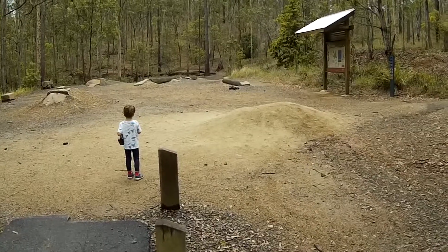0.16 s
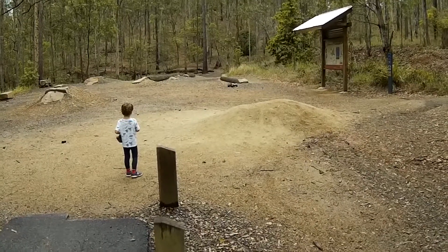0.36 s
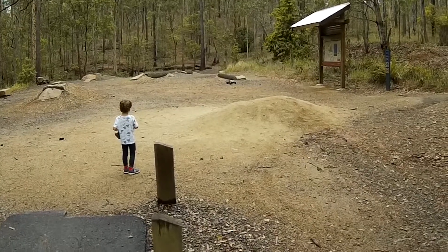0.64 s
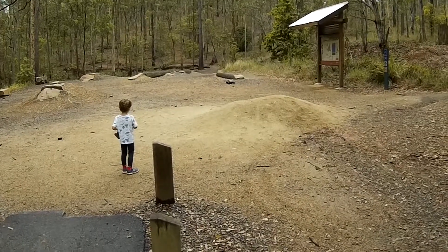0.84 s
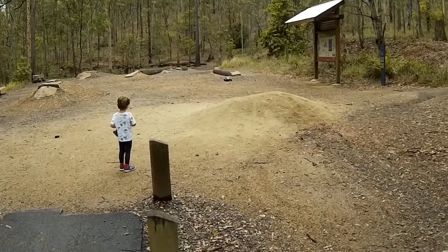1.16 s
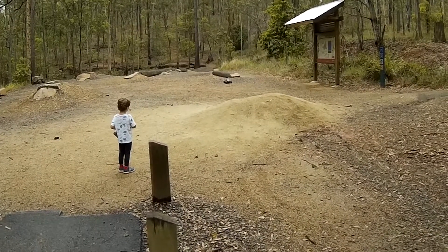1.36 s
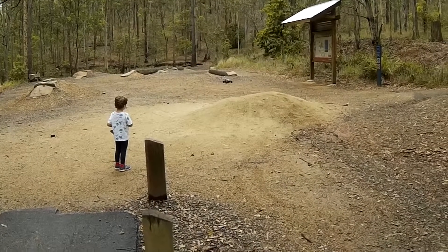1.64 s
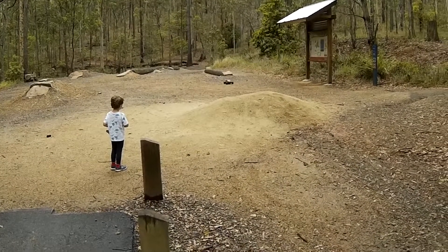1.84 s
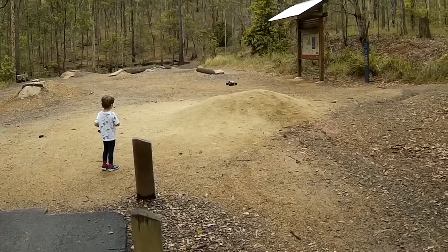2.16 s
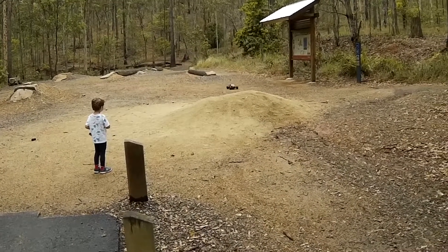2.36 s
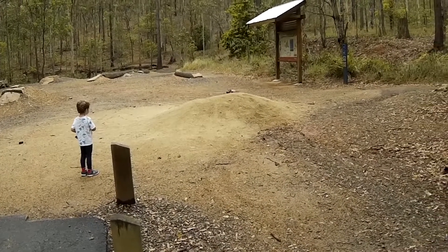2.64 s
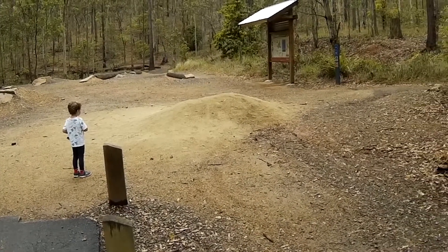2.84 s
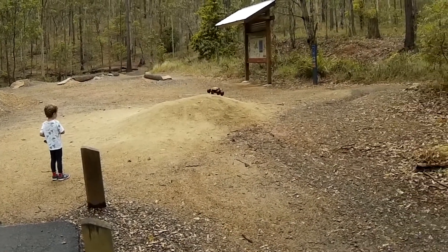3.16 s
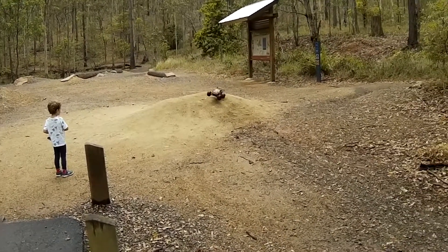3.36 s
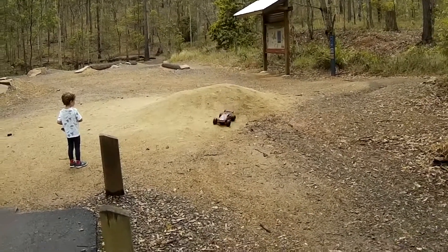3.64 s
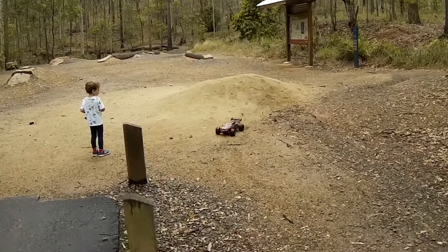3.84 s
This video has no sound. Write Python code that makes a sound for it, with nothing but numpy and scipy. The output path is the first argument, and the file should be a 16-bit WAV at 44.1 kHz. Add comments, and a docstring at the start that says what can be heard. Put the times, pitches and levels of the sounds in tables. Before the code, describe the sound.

Near silence with a few faint plastic ticks and one tiny bird chirp, then a remote-controlled car accelerates with a buzzy gear whir, eases off, and lands in rattling, gritty jolts closer to the outdoor microphone.

```python
"""A dirt clearing in a wood: a small electric model car creeps, then speeds up towards the listener, over a mound.
Its gear mesh is a tone that breaks into noise bands and lights up the modes of a plastic shell.
Coloured random clicks make the rattling gears, thrown grit and rolling tyres; noise makes rumble and air.
Short sine rings and a thin whine mark the creeping car, a gliding sine a far bird.
Timed bursts are the jolts: grit sprays, the shell rattles, the chassis bangs down."""
import sys
import numpy as np
from scipy import signal
from scipy.fft import rfft, irfft
from scipy.io import wavfile

SR = 44100
rng = np.random.default_rng(int(sys.argv[2]) if len(sys.argv) > 2 else 0)


def dump_mix(stems):
    """Bounce the given channels to the path in sys.argv[1] as a 16-bit WAV at rate SR."""
    frames = np.atleast_2d(stems).T  # one column per channel
    limited = np.clip(frames, -1, 1)  # hard clip at full scale
    pcm = np.round(limited * 32767).astype(np.int16)
    wavfile.write(sys.argv[1], SR, pcm)


N = 176400

# Spectra shared by the running car and its jolts; columns: pitch_hz [Hz], relative density_db [dB per Hz]
# lower body of the plastic shell
SHELL_COLOUR = [(590, -77), (1000, -25), (1170, -8.5), (1610, 5), (1790, -0.5), (2150, -2), (2230, -16),
                (2340, -28), (2600, -12), (3380, -13.5), (5720, -120)]
# upper modes of the shell
UPPER_SHELL_COLOUR = [(1290, -19), (2200, 2), (2360, -7), (2600, -6.5), (2820, -14), (3040, 1.5),
                      (3560, -10.5), (3900, -13.5), (5070, -21), (8580, -120)]
# grit thrown by the tyres
GRIT_COLOUR = [(2060, -7.5), (3500, -12.5), (3650, -10.5), (4190, -4), (4610, -8.5), (5290, -1),
               (6020, -9.5), (6890, -0.5), (7300, 1.5), (8810, -8.5), (9500, -16.5), (12400, -46),
               (20900, -120)]
# finest grit, the top treble
FINE_GRIT_COLOUR = [(5530, -37), (9400, -9), (10500, 2), (11400, -7.5), (12300, -5.5), (12800, -10.5),
                    (13400, -23), (14000, -27)]


def amp(db):
    """Decibels to linear gain."""
    return 10 ** (np.asarray(db) / 20)


def rms_one(x):
    """Scales x to an rms of 1."""
    return x / np.sqrt(np.mean(x ** 2) + 1e-20)


def in_time(rows):
    """Columns of a table as curves against time, straight between its rows."""
    s, *columns = np.transpose(rows)
    return [np.interp(np.arange(N) / SR, s, column) for column in columns]


def inside(rows, fade_s):
    """One over the time span of a table, fading to zero outside."""
    t = np.arange(N) / SR
    fade_in = t - rows[0][0] + fade_s
    fade_out = rows[-1][0] + fade_s - t
    return np.clip(np.minimum(fade_in, fade_out) / fade_s, 0, 1)


def drift(rate_hz):
    """Random wander of rms 1: white noise through a double one-pole lowpass."""
    r = np.exp(-2 * np.pi * rate_hz / SR)
    noise = rng.standard_normal(N + SR)
    return rms_one(signal.lfilter([1], [1, -2 * r, r * r], noise)[SR:])  # first second settles the filter


def colour(x, spectrum, edge_db_per_octave=30):
    """Weights x by a spectrum that falls away outside its ends; rms 1."""
    hz, db = np.transpose(spectrum)
    octave = np.log2(np.arange(N // 2 + 1) * SR / N + 1)
    below = np.maximum(np.log2(hz[0]) - octave, 0)
    above = np.maximum(octave - np.log2(hz[-1]), 0)
    gain_db = np.interp(octave, np.log2(hz), db) - edge_db_per_octave * (below + above)
    return rms_one(irfft(rfft(x) * amp(gain_db), N))


def noise_in(spectrum):
    """Steady coloured noise, rms 1."""
    return colour(rng.standard_normal(N), spectrum)


def grains(per_s, spread_db):
    """Random clicks of uneven size and either sign."""
    hits = rng.random(N) < per_s / SR
    sizes = amp(spread_db * np.minimum(rng.exponential(1, N), 5))
    return hits * sizes * rng.choice([-1, 1], N)


def bursts(times, levels_db, rise_s, fall_s):
    """Envelope of short swells: linear rise, exponential fall, each cut off after 0.15 s."""
    t = np.arange(N) / SR
    out = np.zeros(N)
    for s, db, fall in zip(times, levels_db, np.broadcast_to(fall_s, len(times))):
        a, b = int(s * SR), int((s + .15) * SR)
        u = t[a:b] - s
        out[a:b] += amp(db) * np.clip(u / rise_s, 0, 1) * np.exp(-np.maximum(u - rise_s, 0) / fall)
    return out


def resonate(x, hz, width_hz):
    """Two-pole resonance, gain about 1 on top."""
    r = np.exp(-np.pi * width_hz / SR)
    return signal.lfilter([1 - r, 0, r - 1], [1, -2 * r * np.cos(2 * np.pi * hz / SR), r * r], x)


def wood_air():
    """Quiet air of the wood: coloured noise with a slowly wandering level."""
    # spectrum of the wood: pitch_hz [Hz], relative density_db [dB per Hz]
    wood_colour = [(150, -31), (250, 7.5), (322, 4), (533, 5), (899, -1.5), (1440, 9), (1570, -10.5),
                   (1700, -13), (1950, -2), (3070, -9), (7370, -14), (12200, -8), (14000, -18)]
    return amp(-63 + .5 * drift(6.4)) * noise_in(wood_colour)


def rumble():
    """Low roll of the wheels and deep moving air: two bands of noise with their own level curves."""
    # low roll: time_s [s], level_db [dB, before trim]
    roll_levels = [(0.0, -65.5), (1.3, -64.5), (1.49, -56.5), (2.22, -58.5), (2.8, -52), (3.27, -57.5),
                   (3.65, -54), (3.68, -48.5), (3.8, -54), (3.85, -43.5), (3.96, -57), (4.0, -24)]
    # deep air: time_s [s], level_db [dB, before trim]
    air_levels = [(0.0, -62), (1.23, -64.5), (1.39, -59), (3.41, -59), (3.96, -54), (3.99, -40)]
    # spectra of roll and air: pitch_hz [Hz], relative density_db [dB per Hz]
    roll_colour = [(71, -32), (120, -4), (183, 3), (227, -4.5), (280, -1.5), (350, -3.5), (460, -25),
                   (770, -120)]
    air_colour = [(12, -35), (20, -8.5), (60, 0), (140, -5), (180, -32), (310, -120)]
    roll_db, = in_time(roll_levels)
    air_db, = in_time(air_levels)
    roll = amp(roll_db - 1.7) * noise_in(roll_colour)
    deep_air = amp(air_db + 1.0) * noise_in(air_colour)
    return roll + deep_air


def running():
    """Clicks coloured as shell rattle, grit and tyre roll, all shaken together by the rough ground."""
    # car: time_s [s], gear rattle_db, grit and brush hiss_db, tyre roll_db [dB, before trims]
    car_levels = [(0.0, -70, -72, -76), (0.03, -57.5, -70, -65), (0.13, -67, -72.5, -71),
                  (0.41, -57, -68, -60.5), (0.68, -57.5, -71.5, -60.5), (0.71, -49.5, -69, -60),
                  (0.92, -60.5, -70, -68), (1.25, -63.5, -73, -70), (1.33, -39.5, -59, -56.5),
                  (1.35, -45, -58.5, -58), (1.41, -34, -44, -50), (1.45, -36, -45.5, -48),
                  (1.5, -34.5, -42, -46.5), (1.57, -36.5, -45, -49), (1.69, -36.5, -42.5, -47.5),
                  (2.09, -36, -41.5, -49), (2.82, -34.5, -45.5, -46.5), (2.97, -38, -44, -45.5),
                  (3.08, -48, -52, -51), (3.23, -36, -41, -49), (3.28, -36, -46, -49),
                  (3.3, -37, -40.5, -46), (3.42, -37, -41, -44.5), (3.48, -32, -35, -39.5),
                  (3.49, -38, -39, -45), (3.52, -29, -32.5, -37), (3.54, -29.5, -36, -37.5),
                  (3.64, -39.5, -37, -43), (3.66, -30, -33.5, -29), (3.68, -29, -35, -44),
                  (3.69, -24, -19, -31), (3.71, -33, -53, -38), (3.73, -33.5, -39, -40.5),
                  (3.82, -38.5, -40, -41), (3.83, -38, -40.5, -43.5), (3.86, -30, -38.5, -38),
                  (3.91, -39, -39, -41.5), (3.93, -36, -29.5, -37.5), (3.97, -34.5, -37.5, -41),
                  (3.99, -38, -36, -24)]
    # upper shell mode: time_s [s], level_db [dB, before trim]
    upper_levels = [(0.0, -75.5), (0.71, -67), (1.21, -82), (1.37, -42), (1.4, -43), (1.44, -42),
                    (1.47, -34), (1.5, -33), (1.51, -40), (1.62, -40.5), (2.04, -39.5), (2.88, -41),
                    (3.08, -45), (3.2, -37), (3.5, -39), (3.51, -36), (3.68, -36), (3.69, -42), (3.71, -45),
                    (3.77, -63), (3.98, -45), (3.99, -44)]
    # spectrum of the tyres: pitch_hz [Hz], relative density_db [dB per Hz]
    tyre_colour = [(180, -6), (300, -13), (388, -9.5), (434, -5.5), (469, -10.5), (554, -3.5), (611, -4.5),
                   (1010, -2.5), (1160, -11), (1300, -7), (1690, -29), (2860, -120)]
    rattle_db, grit_db, tyre_db = in_time(car_levels)
    upper_db, = in_time(upper_levels)
    shake = drift(26)

    main_mode = rms_one(resonate(grains(1500, 4.4), 1626, 31))  # Hz, width in Hz
    shell = colour(grains(5000, 1.2), SHELL_COLOUR) + amp(-9) * main_mode
    rattle = amp(rattle_db - 3.5 + 0.3 * shake + 0.76 * drift(27)) * shell

    upper_gain = amp(upper_db - 4.5 + 0.56 * shake) * inside(upper_levels, .05)
    upper = upper_gain * colour(grains(5000, 2.6), UPPER_SHELL_COLOUR)
    grit_gain = amp(grit_db - 1.26 + .9 * shake + 0.77 * drift(80))
    grit = grit_gain * colour(grains(12000, 2.36), GRIT_COLOUR)
    tyres = amp(tyre_db - 0.76 + 0.2 * shake) * colour(grains(3000, 1.24), tyre_colour)
    return rattle + upper + grit + tyres


def creeping():
    """Short rough rings of the shell as decaying sines, and a thin whine, perhaps of the speed controller."""
    # rings: start_s [s], level_db [dB, before the shared flutter], pitch_hz [Hz], fall_s [s]
    shell_rings = [(0.029, -49, 1585, 0.0048), (.365, -48, 1530, 0.0071), (.40, -60, 1850, 0.035),
                   (.48, -56, 978, 0.023), (.5, -54, 1590, 0.0074), (.535, -55, 545, 0.04),
                   (.585, -50.5, 1620, 0.037), (.675, -49, 1470, 0.011), (.698, -40.5, 1585, 0.01),
                   (0.719, -46, 1553, 0.0084), (.76, -45, 1576, 0.0082), (.79, -48, 1577, 0.011),
                   (.85, -56, 1620, 0.0099)]
    # thin whine: time_s [s], pitch_hz [Hz], level_db [dB, before trim]
    whine_path = [(0.0, 3940, -99), (0.014, 4005, -82), (0.062, 4015, -76), (0.18, 4009, -98),
                  (0.22, 4000, -75), (0.244, 3912, -90), (0.504, 4019, -74.5), (0.51, 4050, -79),
                  (0.71, 3999, -73), (0.8, 4100, -81)]
    t = np.arange(N) / SR
    rings = np.zeros(N)
    for s, db, hz, fall_s in shell_rings:
        rings += bursts([s], [db], .01, fall_s) * np.sin(2 * np.pi * hz * t)
    rings *= amp(2.1 * drift(60))  # roughness

    hz, db = in_time(whine_path)
    whine_gain = amp(db + 2.0 + 4.3 * drift(30)) * inside(whine_path, .02)
    return rings + whine_gain * np.sin(2 * np.pi * np.cumsum(hz) / SR)


def bird():
    """One short chirp of a far bird: a sine that rises in pitch and levels off."""
    start_s, length_s = .175, .048
    from_hz, to_hz = 1950, 2720
    u = np.clip((np.arange(N) / SR - start_s) / length_s, 0, 1)
    hz = from_hz + (to_hz - from_hz) * np.sin(np.pi * np.minimum(u * 0.62, .5))
    return amp(-65) * np.sin(np.pi * u) * np.sin(2 * np.pi * np.cumsum(hz) / SR)


def sizzle():
    """Finest grit: bright clicks flickering on their own, growing as the car nears."""
    # top treble: time_s [s], level_db [dB, before trim]
    sizzle_levels = [(1.2, -82), (1.27, -83), (1.41, -61.5), (1.57, -56.5), (1.77, -59), (1.85, -53.5),
                     (2.99, -58), (3.07, -65), (3.25, -53), (3.5, -49.5), (3.51, -42), (3.53, -46.5),
                     (3.68, -47), (3.69, -33), (3.72, -51), (3.8, -51.5), (3.83, -43), (3.92, -47),
                     (3.93, -42), (3.99, -45)]
    db, = in_time(sizzle_levels)
    gain = amp(db - 0.1 + 1.2 * drift(32)) * inside(sizzle_levels, .03)
    return gain * colour(grains(9000, 2.3), FINE_GRIT_COLOUR, 60)


def noise_band(width_hz):
    """Complex wander that smears a tone into a band of noise."""
    return (drift(width_hz) + 1j * drift(width_hz)) / np.sqrt(2)


def blur(rough, wide, stretch):
    """Mix of the clean tone with a narrow and a wide noise band, by shares of power."""
    narrow_hz, wide_hz = 50, 200
    narrow_part = np.sqrt(1 - wide) * noise_band(stretch * narrow_hz)
    wide_part = np.sqrt(wide) * noise_band(stretch * wide_hz)
    return np.sqrt(1 - rough) + np.sqrt(rough) * (narrow_part + wide_part)


def gear_whine():
    """Tooth rate and its octave, cleaner at the start, then rough and heard mostly through shell modes."""
    # gear mesh: time_s [s], tooth rate pitch_hz [Hz], level_db, octave_db [dB, before roughness and modes]
    mesh_path = [(1.28, 740.5, -78, -66), (1.315, 834, -66, -48.5), (1.345, 1083, -61, -45),
                 (1.36, 1301, -48, -70), (1.385, 1516, -38.5, -47), (1.403, 1630, -28, -29),
                 (1.418, 1636, -29, -49), (1.432, 1715, -33.5, -41), (1.447, 1994, -41, -67),
                 (1.48, 2150, -39, -74), (1.515, 2233, -35, -67), (1.55, 2280, -47, -64),
                 (1.6, 2506, -49.5, -53), (1.7, 2560, -53, -46), (1.76, 2750, -45.5, -44),
                 (1.82, 2880, -39.5, -49), (1.88, 3110, -42, -40), (1.95, 3077, -40, -46),
                 (2.1, 2914, -41.5, -41), (2.4, 3130, -44.5, -46), (2.75, 3170, -48.5, -73),
                 (3.0, 2900, -68, -67), (3.14, 2100, -58.5, -70), (3.24, 2130, -41.5, -62),
                 (3.4, 2134, -46, -59), (3.55, 2147, -44, -71), (3.63, 2140, -64, -70)]
    # break-up under load: time_s [s], rough share [0-1], wide band's share of the rough part [0-1]
    breakup_shares = [(1.3, .15, 0), (1.43, .12, 0), (1.47, .9, .3), (1.55, .6, .3), (1.62, 1, .5),
                      (2.0, 1, .8), (2.2, 1, .6), (3.0, 1, .6), (3.15, 1, .4)]
    # shell modes lit up in passing: pitch_hz [Hz], width_hz [Hz], level_db [dB]
    whine_modes = [(1645, 20, 3.5), (2073, 24, -4), (2130, 34, -2.5), (2243, 25, 5), (2507, 41, 9.5),
                   (2760, 79, 8), (3095, 98, -0.5), (3227, 88, 4.5)]
    hz, db, octave_db = in_time(mesh_path)
    rough, wide = in_time(breakup_shares)
    turn = np.exp(2j * np.pi * np.cumsum(hz) / SR)
    mesh = amp(db + 2.4 * rough * drift(28)) * turn * blur(rough, wide, 1)
    octave = amp(octave_db) * turn ** 2 * blur(rough, wide, 1.6)
    tone = np.sqrt(2) * np.real(mesh + octave) * inside(mesh_path, .02)

    out = tone * amp(-9 * rough ** 2)  # the direct whine loses 9 dB when fully rough
    for k, (mode_hz, width_hz, mode_db) in enumerate(whine_modes):
        out = out + (-1) ** k * amp(mode_db) * resonate(tone, mode_hz, width_hz)  # alternating sign
    return out


def jolts():
    """Jolts over the mound: each sprays grit, rattles the shell and thuds a moment later."""
    # jolts: start_s [s], grit_db, shell rattle_db, thud_db [dB, before trims], fall_s [s, before stretching]
    jolt_times = [(3.1764, -27.5, -28, -39, 0.0081), (3.201, -24, -29, -57, 0.0095),
                  (3.2236, -30, -26.5, -58, 0.0074), (3.2495, -22.5, -31, -63, 0.0072),
                  (3.2886, -20, -30, -38.5, 0.008), (3.3396, -20.5, -30, -33, 0.009),
                  (3.378, -21, -32.5, -38, 0.008), (3.431, -21.5, -29, -43, 0.0076),
                  (3.466, -31, -28.5, -39, 0.0066), (3.5083, -16, -31.5, -39.5, 0.0065),
                  (3.5494, -13.5, -26, -43, 0.0049), (3.584, -18, -27, -39.5, 0.008),
                  (3.6213, -16.5, -32, -42, 0.0089), (3.656, -20.5, -27, -34, 0.0057),
                  (3.6716, -22, -23.5, -40, 0.0042), (3.6814, -10, -24, -18, 0.0075),
                  (3.7034, -23.5, -34, -31, 0.008), (3.775, -26, -28.5, -39, 0.008),
                  (3.86, -41, -28, -39, 0.0086), (3.915, -33, -39, -37, 0.0094),
                  (3.978, -29, -28, -37, 0.0074), (3.9863, -21, -27, -27, 0.0067)]
    # spectrum of the low thud: pitch_hz [Hz], relative density_db [dB per Hz]
    thud_colour = [(120, -38), (200, -27), (343, -17), (545, -4), (599, -3), (673, -4), (1040, -6.5),
                   (1210, -25), (1300, -10), (1690, -37), (2860, -120)]
    s, grit_db, rattle_db, thud_db, fall_s = np.transpose(jolt_times)

    spray = noise_in(GRIT_COLOUR) + 0.25 * noise_in(FINE_GRIT_COLOUR)
    shell = colour(grains(6000, 0.72), SHELL_COLOUR) + .5 * colour(grains(2800, 3.2), UPPER_SHELL_COLOUR)
    thud_ring = rms_one(resonate(rng.standard_normal(N), 524, 60))  # Hz, width in Hz
    thud = colour(grains(3000, 1.2), thud_colour) + amp(-4.5) * thud_ring

    spray_swell = bursts(s, grit_db - 13.5, .003, fall_s)
    shell_swell = bursts(s, rattle_db - 5, 0.0055, 1.13 * fall_s)
    thud_swell = bursts(s + 0.0043, thud_db - 9, 0.0087, 2.15 * fall_s)  # 4.3 ms late
    return spray_swell * spray + shell_swell * shell + thud_swell * thud


def scene():
    """All layers summed into one channel."""
    car = rumble() + running() + creeping() + sizzle() + gear_whine() + jolts()
    return (wood_air() + bird() + car)[None]


def record(dry):
    """Steep lowpass: the top is cut, 60 dB down from 14.8 kHz."""
    return signal.sosfilt(signal.cheby2(12, 60, 14800, fs=SR, output="sos"), dry)


dry = scene()
out = record(dry)
dump_mix(out)
```